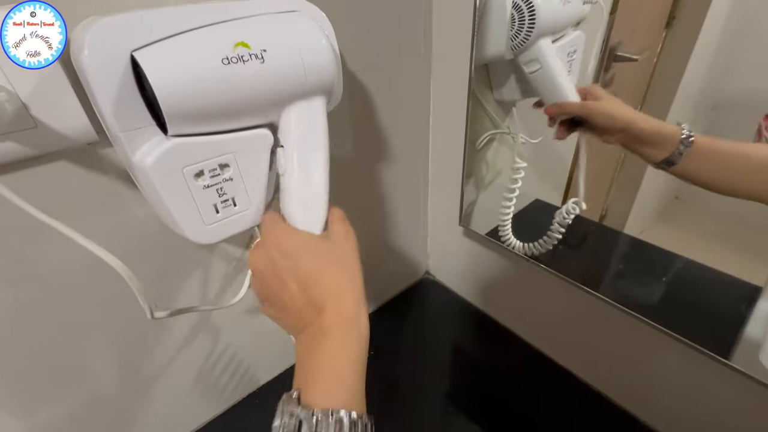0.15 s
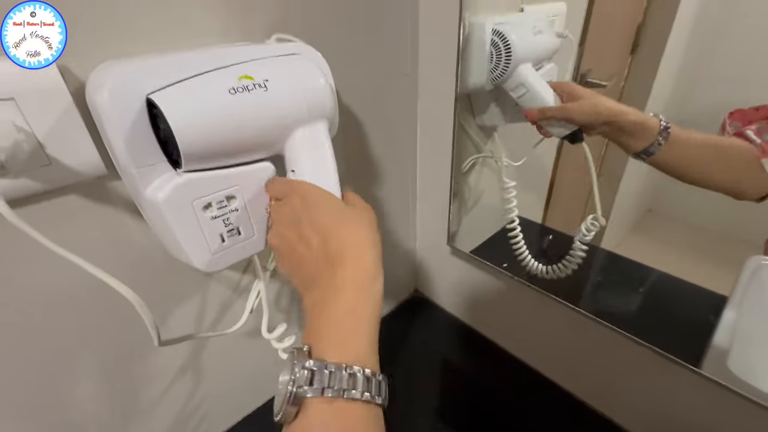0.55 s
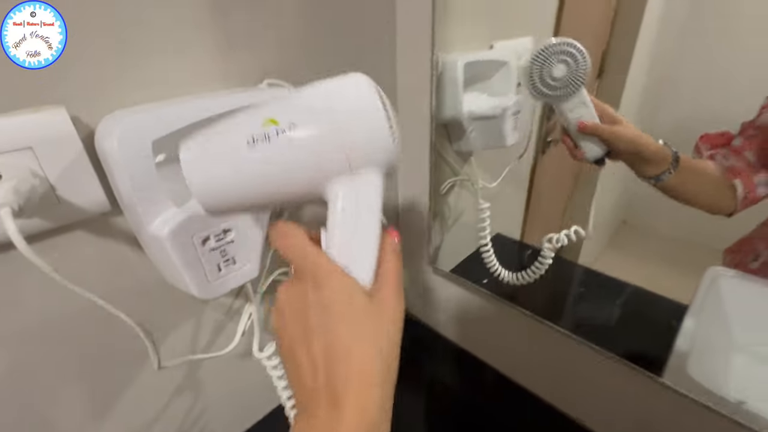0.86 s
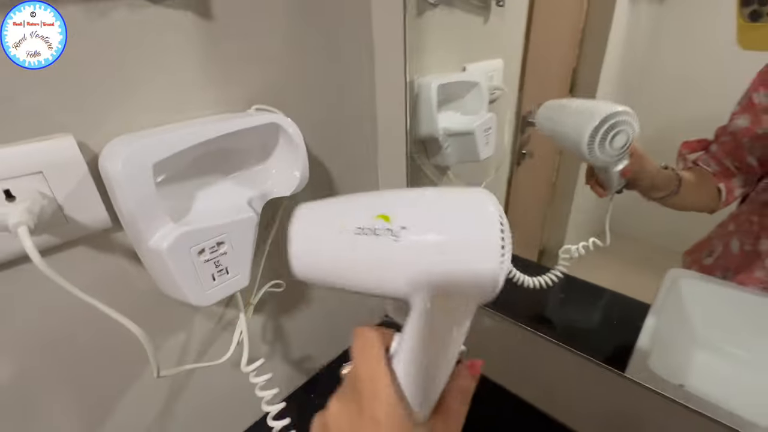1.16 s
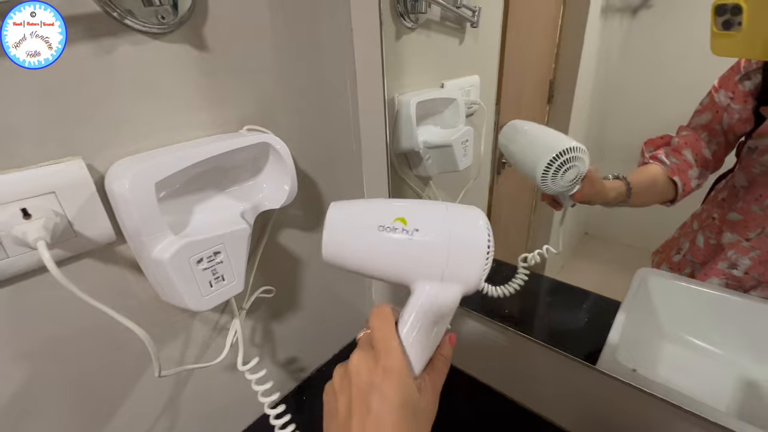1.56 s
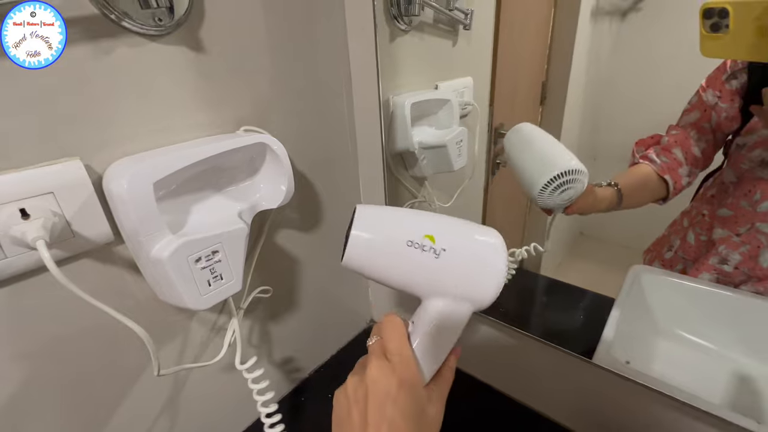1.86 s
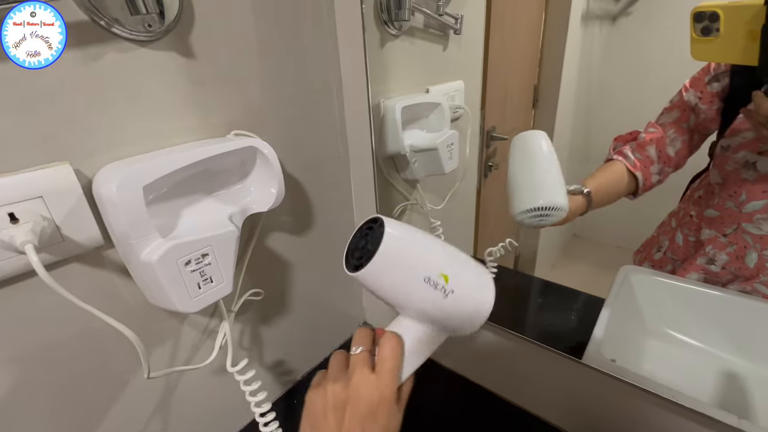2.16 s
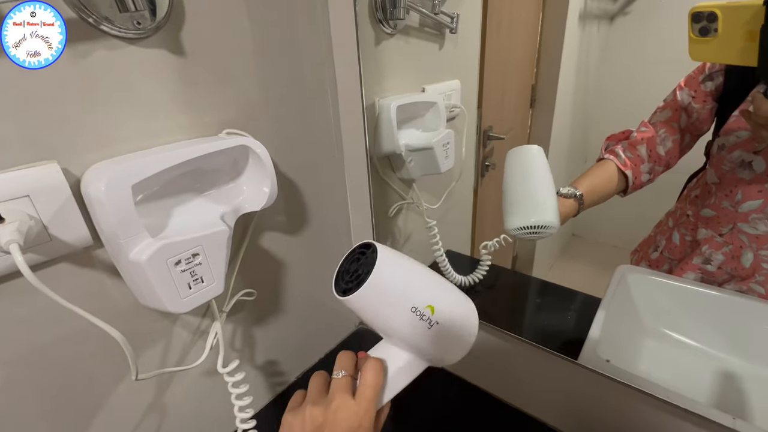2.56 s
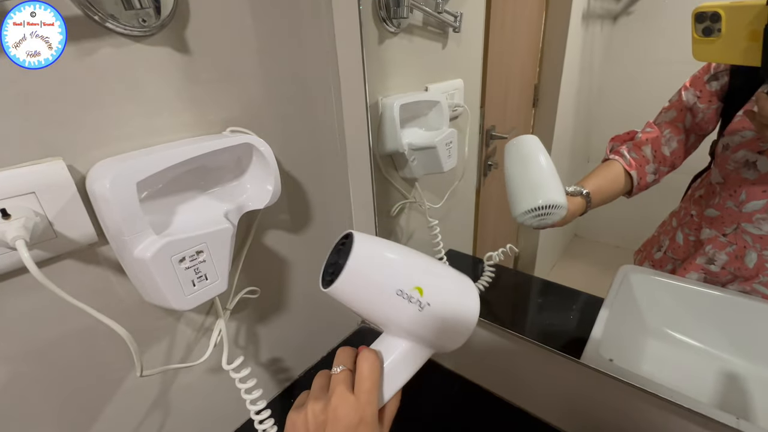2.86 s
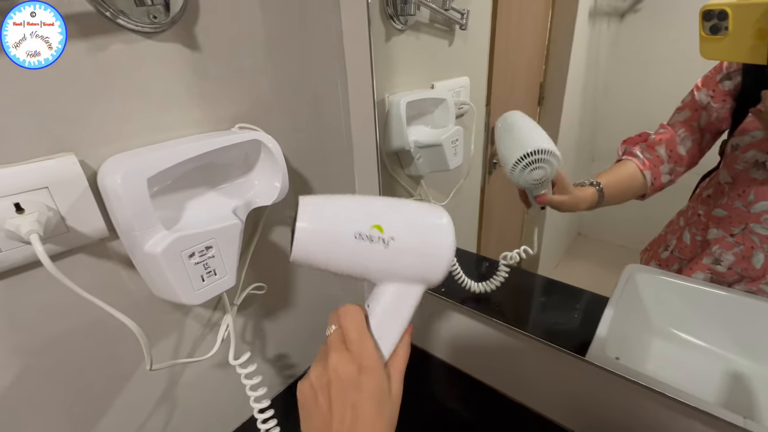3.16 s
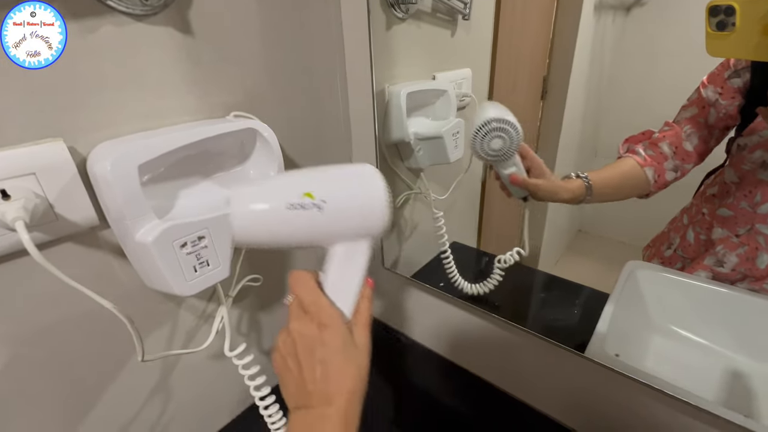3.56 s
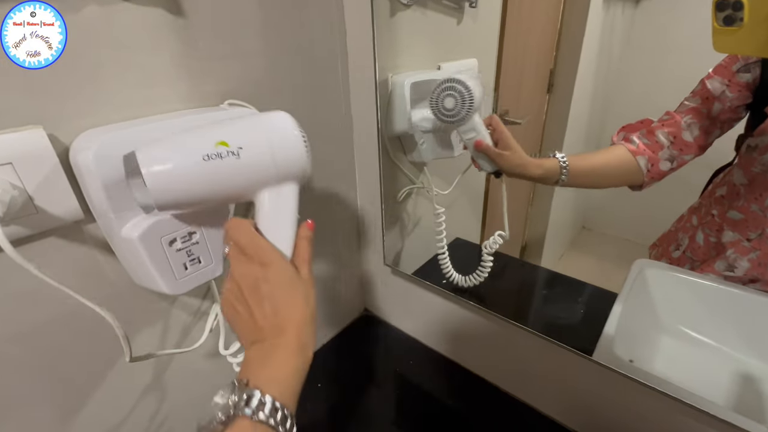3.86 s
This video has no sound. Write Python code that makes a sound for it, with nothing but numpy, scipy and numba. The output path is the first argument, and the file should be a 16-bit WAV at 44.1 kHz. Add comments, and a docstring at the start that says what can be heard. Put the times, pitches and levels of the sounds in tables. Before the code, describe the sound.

A small hair dryer bumps and clacks out of its plastic holder, then blows in four clicked bursts, rising and winding down, close up in a tiled bathroom with a faint ventilator hum.

```python
"""Hair dryer in a tiled bathroom

A small hair dryer slides out of its plastic wall holder and is switched on in four short bursts.
Bumps, clacks and switch snaps are decaying modes behind a crack of noise; slides are swells of coloured noise.
Fan speed follows exponential run-up and coast-down; its powers scale the rush of air (coloured noise),
the hollow howl of the barrel (noise in a moving resonance) and a faint motor whir.
The room adds a brief noise tail, and a ventilator hums throughout as wavering low tones over a rumble.
"""
import sys
import numpy as np
from scipy import signal
from scipy.fft import rfft, irfft
from scipy.io import wavfile
from numba import njit

SR = 44100
rng = np.random.default_rng(int(sys.argv[2]) if len(sys.argv) > 2 else 0)


def wrap_up_sound(samples):
    """Save the sound to the file named by the first command line argument, as 16-bit audio."""
    columns = np.atleast_2d(samples).T
    # keep every value between -1 and 1, then stretch to whole-number steps
    tamed = np.clip(columns, -1, 1)
    steps = np.round(tamed * 32767).astype(np.int16)
    wavfile.write(sys.argv[1], SR, steps)


N = 176400

# Levels in spectra and mode tables are relative; a width is that of one band-pass stage unless noted.
# Ventilator and mains hum: [f/Hz, level/dB, waver/ratio]
HUM = [(71.5, -50.5, 1.1), (99.8, -45.5, .45), (125.6, -60, 0.92), (160, -63, 1.3)]
# Rumble spectrum of the room: [f/Hz, level/dB]
ROOM_TONE = [(25, -30), (45, -11), (75, 2), (160, -7), (220, -12.5), (270, -8.5), (335, -3), (430, -18.5),
             (550, -20), (1200, -26.5), (3000, -34.5), (9000, -40), (15500, -55)]
ROOM_TONE_DB = -51.5

# Plastic sliding on plastic and skin: [middle t/s, Gaussian half length t/s, scrape level/dB, rub level/dB]
SLIDES = [(0, 0.055, -62, -50), (0.18, 0.066, -64.5, -57.5), (0.406, 0.033, -67.5, -63),
          (0.612, 0.041, -55.5, -59.5), (0.792, 0.0053, -69, -56.5), (0.887, 0.16, -61.5, -64),
          (3.484, 0.028, -43.5, -48), (3.625, 0.048, -49.5, -47.5), (3.754, 0.091, -71, -52)]
# Spectrum of the bright scrape: [f/Hz, level/dB]
SCRAPE = [(300, -22), (1000, -1), (2000, 3.5), (5000, -0.5), (9500, -1.5), (15500, -12)]
# Spectrum of the low rub: [f/Hz, level/dB]
RUB = [(150, -9.5), (400, -4.5), (700, -1), (1100, -7), (1800, -21.5), (6000, -34)]
# The dryer bumps and judders in the holder: [t/s, level/dB]
BUMPS = [(0.381, -45), (0.404, -43), (.412, -28), (0.432, -42.5), (0.448, -41), (0.479, -38.5),
         (.512, -42.5)]
# Modes of the holder: [f/Hz, level/dB, decay by 60 dB t/s]
HOLDER_MODES = [(164, -20, 0.052), (328, -5, 0.56), (438, -13, 0.063), (588, -8.5, 0.058),
                (1150, -7.5, 0.052)]
# Contact noise of a bump: [f/Hz, level/dB]
HOLDER_CRACK = [(100, -5), (200, 4.5), (450, 10), (900, -5), (1800, -13), (4000, -25), (15500, -53)]
# Light plastic clacks, the first as the dryer clears its holder: [t/s, level/dB]
CLACKS = [(0.7997, -23.5), (1.339, -34), (3.962, -44.5)]
# Modes of the light plastic: [f/Hz, level/dB, decay by 60 dB t/s]
PLASTIC_MODES = [(1670, -8.5, 0.046), (2850, -11, 0.019), (3480, 5, 0.028), (4280, -8, 0.028),
                 (5760, -4, 0.12), (5940, 2, 0.091), (6230, 1, 0.045)]
# Contact noise of a clack: [f/Hz, level/dB]
PLASTIC_CRACK = [(200, -36), (600, -5.5), (1200, -3.5), (3300, -1), (6000, -5.5), (10000, -5), (15500, -20)]

# Bursts: [switch on t/s, switch off t/s, on click level/dB, off click level/dB, drive/share of full speed]
BURSTS = [(1.203, 1.809, -20, -37, 1.0), (2.059, 2.334, -25, -25, 0.99), (2.488, 2.697, -25.5, -31, 0.99),
          (2.813, 3.226, -26, -29, 1.02)]
# Modes of the dryer's shell at the switch: [f/Hz, level/dB, decay by 60 dB t/s]
SHELL_MODES = [(840, 5, 0.018), (2200, 6.5, 0.013), (3550, 2, 0.01), (5040, 6.5, 0.024), (5150, -6, 0.09),
               (8300, -4, 0.018)]
# Contact noise of the switch: [f/Hz, level/dB]
SWITCH_CRACK = [(200, -20), (700, -2.5), (1400, -6.5), (2700, -5), (3600, 0.5), (5000, -0.5), (7000, -7),
                (10000, -9.5), (15500, -19)]
# Bright tick as the contacts meet and part: [f/Hz, level/dB]
CONTACT_TICK = [(1000, -25), (6000, -3), (10000, 3), (14000, 1), (16000, 0)]
CONTACT_TICK_DB = -23
CONTACT_S, SNAP_S = 0.0005, 0.0044  # time constants of onset and of crack decay
RING_BLUR = 0.03  # width of a struck mode as a share of its frequency

RUN_UP_S, COAST_S = 0.22, 0.48  # time constants of the fan
# Rush of air at full speed: [f/Hz, level/dB per Hz]
AIR = [(60, -11.5), (150, -0.5), (330, -1.5), (480, -5), (750, 5), (1500, 4), (2600, 1.5), (4500, 0),
       (7000, -4), (9500, -6.5), (12000, -22), (14300, -12), (15500, -24.5)]
AIR_DB, AIR_PAN_DB, AIR_SPLIT_HZ = -25.5, -0.5, 1710
AIR_POWER_LOW, AIR_POWER_HIGH = 1.96, 3.67  # amplitude grows as speed ** power
HOWL_REST_HZ, HOWL_RISE_HZ, HOWL_WIDTH_HZ, HOWL_WANDER = 600, 510, 230, 0.012
HOWL_DB, HOWL_PAN_DB, HOWL_POWER = -32, 6, 4.55
HOWL_KNEE = 0.76  # share of full speed above which the howl levels off
# Resonances of housing and alcove that lift air and howl: [f/Hz, Gaussian half width f/Hz, lift level/dB]
HOLLOWS = [(348, 37, 5), (466, 31, 9), (600, 17, 6.5), (670.4, 17.6, 12.5), (738, 9.6, 2.5), (813, 32, 4),
           (878.6, 19, 7.5), (961, 33, 5.5), (986, 6.1, 10.5), (1067.4, 25, 7), (1181, 22, 3.5),
           (1750, 22, 1)]
# Barrel modes heard as the nozzle swings toward the listener: [f/Hz, width f/Hz, level/dB]
NOZZLE = [(333, 42, -42), (2080, 150, -37.5)]
FACING_S, FACING_HALF_S, NOZZLE_POWER, HOWL_FACING_DB = 2.61, 0.75, 1.85, -0.5
BARREL_HZ, BARREL_WIDTH_HZ, BARREL_DB, BARREL_POWER = 1010, 40, -43.5, 1.1
# Thin tones that follow the howl: [ratio to its pitch, level/dB]
STRANDS = [(.8, -43.5), (.93, -40), (1.04, -38.5), (1.13, -40.5)]
STRAND_WIDTH_HZ, STRAND_POWER = 24, 1.5
FLICKER_DB = 2.5  # spread of level for strands, nozzle and barrel
# Standing waves in the tiled corner: [f/Hz, width f/Hz, level/dB]
CORNER = [(487, 24, -45), (592, 25, -36.5), (802, 27, -36), (875, 71, -29.5), (960, 28, -31.5),
          (1165, 45, -37.5), (1430, 80, -36)]
CORNER_POWER, CORNER_PAN_DB = 1.7, 2.5
CORNER_REACH_HZ, CORNER_FAR_SHARE = 110, 0.63  # a wave swells as the howl passes within reach
# Brush and bearing noise ringing in the motor: [f/Hz, width f/Hz, level/dB]
BRUSHES = [(1692, 49, -46.5), (3520, 410, -43), (4220, 36, -48), (4480, 73, -47.5), (7500, 4100, -52)]
BRUSH_POWER = 2.5

ROOM_T60_S, ROOM_TREBLE_T60_S, ROOM_GAP_S = 0.36, 0.18, 0.0065
# Balance of left and right: [f/Hz, left minus right level/dB]
STEREO_BALANCE = [(300, 1), (1100, 0.5), (2400, 2), (4300, 2), (5300, 6.5), (6700, 4.5), (9200, -4.5),
                  (11000, 0)]
# The high treble is wide in a band, then centred above an edge
WIDE_HZ, WIDE_HALF_HZ, WIDE_MID_DB = 11610, 1025, -16.5
CENTRED_HZ, CENTRED_SIDE_DB, TOP_HZ = 13400, -25, 15750


def undb(db):
    """Logarithmic level: decibels to amplitude gain."""
    return 10 ** (np.asarray(db) / 20)


def unit(x):
    """Normalisation: scale to rms 1."""
    return x / np.sqrt(np.mean(x ** 2))


def pan(db):
    """Interaural level difference: half is given to each side with opposite sign."""
    return undb(np.array([[db], [-db]]) / 2)


def noise(likeness=0.):
    """Partial coherence: white noise for two ears shares a given part of its power."""
    shared = np.clip(likeness, 0, 1)
    return np.sqrt(1 - shared) * rng.standard_normal((2, N)) + np.sqrt(shared) * rng.standard_normal(N)


def shape(x, gain):
    """Linear filtering: multiply the spectrum by a gain given as a function of frequency."""
    f = np.maximum(np.fft.rfftfreq(2 * N, 1 / SR), 1)
    return irfft(rfft(x, 2 * N) * gain(f))[..., :N]


def colour(x, points):
    """Spectral shaping: interpolate (f/Hz, level/dB) points over log frequency, at rms 1."""
    hz, db = np.array(points).T
    return unit(shape(x, lambda f: undb(np.interp(np.log(f), np.log(hz), db))))


def walk(rate):
    """Slow random fluctuation: noise low-passed near rate in Hz, with spread 1."""
    return unit(shape(rng.standard_normal(N), lambda f: np.exp(-(f / rate) ** 2)))


@njit
def resonate(x, hz, width):
    """Resonance: a state-variable band-pass whose centre may move."""
    y, band, low = np.empty(len(x)), 0., 0.
    for i in range(len(x)):
        g, k = np.tan(np.pi * hz[i] / SR), width / hz[i]
        v = (band + g * (x[i] - low)) / (1 + g * (g + k))
        band, low, y[i] = 2 * v - band, low + 2 * g * v, k * v
    return y


def blown(hz, width, likeness):
    """Turbulent excitation: noise through two equal resonances in series, at rms 1."""
    hz, width = hz * np.ones(N), float(width)
    return unit(np.array([resonate(resonate(x, hz, width), hz, width) for x in noise(likeness)]))


def bathroom(x, t, wet_db):
    """Reverberation: a dense exponential tail, shorter in the treble, follows the direct sound."""
    tail = noise()
    low = shape(tail, lambda f: 1 / (1 + (f / 4000) ** 2))
    decaying = low * 1e-3 ** (t / ROOM_T60_S) + (tail - low) * 1e-3 ** (t / ROOM_TREBLE_T60_S)
    tail = decaying * (t > ROOM_GAP_S)
    return x + undb(wet_db) * signal.fftconvolve(x, unit(tail) / np.sqrt(N), axes=1)[:, :N]


def strike(t, hits, modes, crack, crack_s, ring_db, likeness):
    """Modal excitation: each (t/s, level/dB) hit is a crack of contact and a rattly ring of modes."""
    out = np.zeros((2, N))
    age = t[:SR // 3]
    grit = colour(noise(likeness), crack)
    for start, db in hits:
        i = int(start * SR)
        n = min(len(age), N - i)
        # Random phase drift widens each mode by a share of its frequency
        drift = np.cumsum(rng.standard_normal((2, len(age))), axis=1)
        drift *= np.sqrt(RING_BLUR / (2 * np.pi * SR))
        ring = np.zeros((2, len(age)))
        for hz, mode_db, t60 in modes:
            cycles = hz * age + np.sqrt(hz) * drift + rng.random((2, 1)) / 2
            ring += undb(mode_db) * np.exp(-np.log(1000) * age / t60) * np.sin(2 * np.pi * cycles)
        burst = grit[:, i:i + n] * np.exp(-age[:n] / crack_s) + undb(ring_db) * ring[:, :n]
        onset = 1 - np.exp(-age[:n] / CONTACT_S)
        out[:, i:i + n] += undb(db) * burst * onset
    return out


def ventilator(t):
    """Random modulation: low tones waver in amplitude and phase over a soft rumble."""
    hum = np.zeros(N)
    for hz, db, waver in HUM:
        envelope = 1 + waver * (walk(4.6) + 1j * walk(6.2)) / np.sqrt(2)
        carrier = np.exp(2j * np.pi * (hz * t + rng.random()))
        hum += undb(db) * np.sqrt(2) * np.real(envelope * carrier)
    return hum * pan(0.42) + undb(ROOM_TONE_DB) * colour(noise(likeness=0.28), ROOM_TONE)


def slides(t):
    """Friction noise: a bright scrape and a low rub swell together with each slide."""
    scrape = colour(noise(likeness=0.066), SCRAPE)
    rub = colour(noise(likeness=0.41), RUB)
    out = np.zeros((2, N))
    for mid, half, scrape_db, rub_db in SLIDES:
        swell = np.exp(-((t - mid) / half) ** 2)
        out += swell * (undb(scrape_db) * scrape + undb(rub_db) * rub)
    return out * undb(3.0 * walk(49))


def handling(t):
    """Impact and friction: the dryer slides, bumps and clacks against the holder."""
    bumps = strike(t, BUMPS, HOLDER_MODES, HOLDER_CRACK, crack_s=0.0045, ring_db=-5.5, likeness=0.83)
    clacks = strike(t, CLACKS, PLASTIC_MODES, PLASTIC_CRACK, crack_s=SNAP_S, ring_db=-11.0, likeness=0.15)
    return bathroom(clacks, t, wet_db=-3.5) + bathroom(bumps + slides(t), t, wet_db=-2.5)


def switch(t):
    """Impulsive excitation: each press and release rings the shell, and the contacts tick."""
    hits = []
    for on, off, on_db, off_db, _ in BURSTS:
        hits += [(on, on_db), (off, off_db)]
    snaps = strike(t, hits, SHELL_MODES, SWITCH_CRACK, crack_s=SNAP_S, ring_db=-11, likeness=0.21)
    contacts = [(start, CONTACT_TICK_DB) for start, _ in hits]
    tick_mode = [(14300, 0, 0.008)]  # f/Hz, level/dB, decay by 60 dB t/s
    ticks = strike(t, contacts, tick_mode, CONTACT_TICK, crack_s=SNAP_S, ring_db=-14, likeness=0.27)
    return bathroom(snaps, t, wet_db=-2.0) + bathroom(ticks, t, wet_db=-1.5)


def fan_speed(t):
    """First-order relaxation: speed nears the drive while the switch is held, then dies away."""
    speed = np.zeros(N)
    for on, off, _, _, drive in BURSTS:
        held = np.clip(t - on, 0, off - on)
        climb = drive + (speed[int(on * SR)] - drive) * np.exp(-held / RUN_UP_S)
        coast = np.exp(-np.maximum(t - off, 0) / COAST_S)
        speed = np.where(t < on, speed, climb * coast)
    return speed


def howl_pitch(speed):
    """Speed-dependent frequency: the howl rises linearly with fan speed and wavers a little."""
    return (HOWL_REST_HZ + HOWL_RISE_HZ * speed) * (1 + HOWL_WANDER * walk(12.0))


def rush(speed):
    """Turbulence noise: the treble grows by a higher power of speed, so the rush brightens."""
    air = colour(noise(likeness=0.12), AIR)
    low = shape(air, lambda f: 1 / (1 + (f / AIR_SPLIT_HZ) ** 2))
    by_speed = low * speed ** AIR_POWER_LOW + (air - low) * speed ** AIR_POWER_HIGH
    return undb(AIR_DB + 0.5 * walk(6.3)) * by_speed


def howl(speed, pitch, facing):
    """Saturating resonance: noise in a moving band swells with speed, then levels off."""
    swell = np.tanh((speed / HOWL_KNEE) ** HOWL_POWER)
    level = undb(HOWL_DB + HOWL_FACING_DB * facing + 1.7 * walk(22))
    return level * swell * blown(pitch, HOWL_WIDTH_HZ, likeness=0.44)


def hollow_lift(f):
    """Fixed resonances: housing and alcove lift narrow bands of the spectrum."""
    return undb(sum(db * np.exp(-((f - hz) / width) ** 2) for hz, width, db in HOLLOWS))


def nozzle(speed, facing):
    """Directivity: barrel modes grow as the nozzle swings toward the listener."""
    modes = sum(undb(db + FLICKER_DB * walk(4.7)) * blown(hz, width, likeness=0.93)
                for hz, width, db in NOZZLE)
    return facing * speed ** NOZZLE_POWER * modes


def barrel(speed):
    """Fixed-pitch resonance: a low power of speed lets the barrel's note linger as the fan slows."""
    level = undb(BARREL_DB + FLICKER_DB * walk(6.6))
    return speed ** BARREL_POWER * level * blown(BARREL_HZ, BARREL_WIDTH_HZ, likeness=0.48)


def airflow(t, speed, pitch):
    """Source and filter: rush and howl pass the hollows, then nozzle and barrel notes join."""
    facing = np.exp(-((t - FACING_S) / FACING_HALF_S) ** 2)
    echoing_howl = bathroom(howl(speed, pitch, facing), t, wet_db=-7)
    stream = rush(speed) * pan(AIR_PAN_DB) + echoing_howl * pan(HOWL_PAN_DB)
    return shape(stream, hollow_lift) + nozzle(speed, facing) + barrel(speed)


def strands(speed, pitch):
    """Narrow-band noise: thin wavering tones at fixed ratios to the howl follow the fan."""
    tones = sum(undb(db + FLICKER_DB * walk(7.6)) * blown(pitch * ratio, STRAND_WIDTH_HZ, likeness=0.59)
                for ratio, db in STRANDS)
    return speed ** STRAND_POWER * tones


def corner(speed, pitch):
    """Standing waves: the howl feeds wall modes that reach the two ears in opposite phase."""
    waves = np.zeros((2, N))
    for hz, width, db in CORNER:
        nearness = np.exp(-((pitch - hz) / CORNER_REACH_HZ) ** 2)
        fed = CORNER_FAR_SHARE + (1 - CORNER_FAR_SHARE) * nearness
        waves += undb(db) * fed * blown(hz, width, likeness=0.94)
    return speed ** CORNER_POWER * waves * pan(CORNER_PAN_DB) * np.array([[1], [-1]])


def motor(speed):
    """Noise-driven resonance: brushes and bearings make a faint dry whir that follows the fan."""
    whir = sum(undb(db) * blown(hz, width, likeness=0.21) for hz, width, db in BRUSHES)
    return speed ** BRUSH_POWER * whir


def scene():
    """Superposition: dryer, hand and room sound together."""
    t = np.arange(N) / SR
    speed = fan_speed(t)
    pitch = howl_pitch(speed)
    dryer = airflow(t, speed, pitch) + strands(speed, pitch) + corner(speed, pitch) + motor(speed)
    return ventilator(t) + handling(t) + switch(t) + dryer


def record(dry):
    """Stereo image: sides differ in balance, high treble is wide in a band, then centred; the top is cut."""
    hz, db = np.array(STEREO_BALANCE).T
    sides = np.array([[1], [-1]])
    left, right = shape(dry, lambda f: undb(np.interp(np.log(f), np.log(hz), db) * sides / 2))

    def mid_dip(f):
        """Band rejection: a flat-bottomed dip in the middle signal widens the band."""
        return undb(WIDE_MID_DB * np.exp(-((f - WIDE_HZ) / WIDE_HALF_HZ) ** 4))

    def side_shelf(f):
        """High shelf: a smooth step down in the side signal centres the treble above it."""
        return undb(CENTRED_SIDE_DB * (1 + np.tanh((f - CENTRED_HZ) / 300)) / 2)

    mid = shape((left + right) / 2, mid_dip)
    side = shape((left - right) / 2, side_shelf)
    top_cut = signal.ellip(10, 0.2, 80, TOP_HZ, fs=SR, output="sos")
    return signal.sosfilt(top_cut, np.array([mid + side, mid - side]))


dry = scene()
out = record(dry)
wrap_up_sound(out)
```